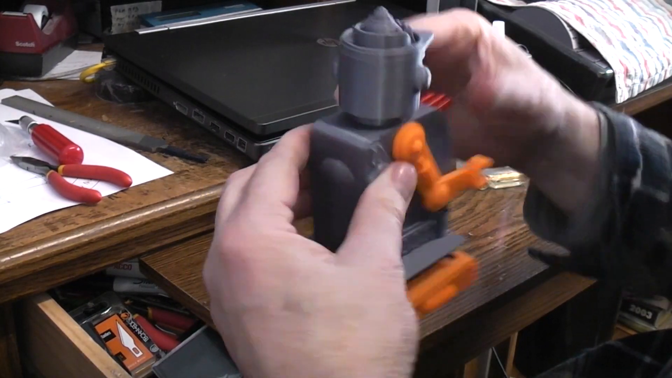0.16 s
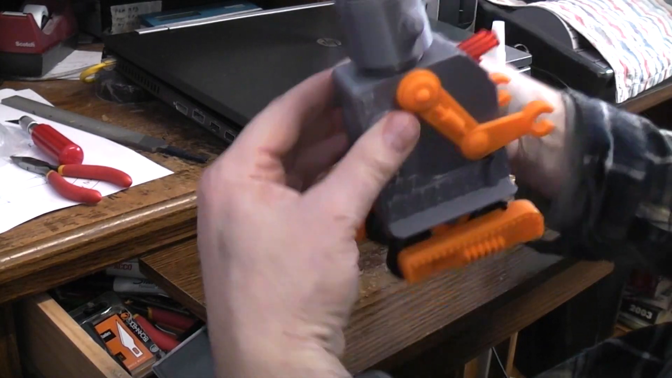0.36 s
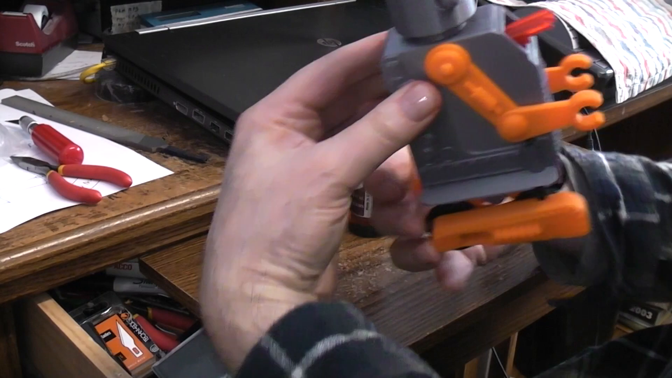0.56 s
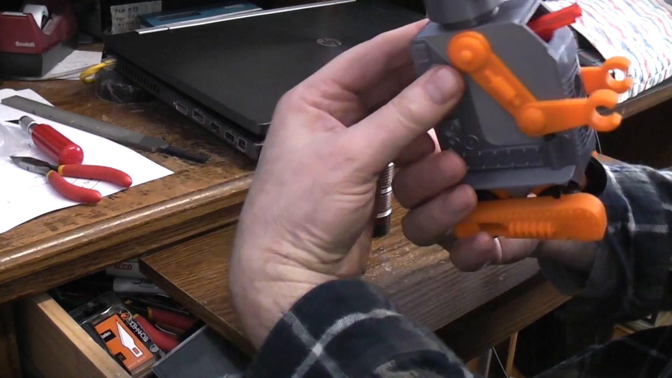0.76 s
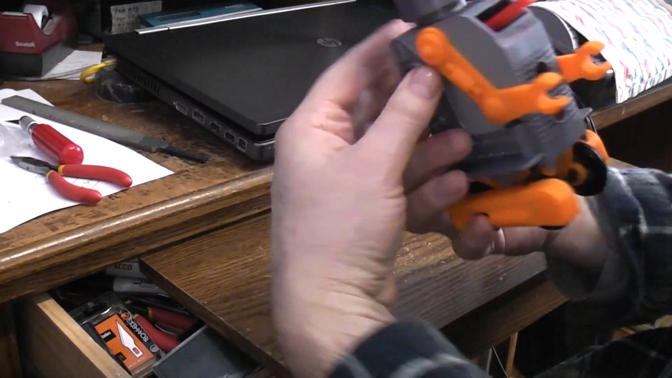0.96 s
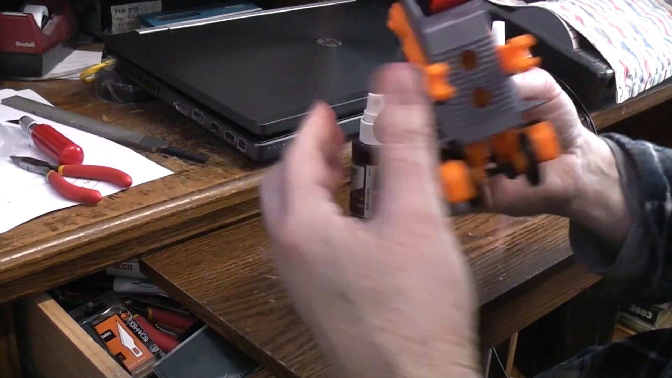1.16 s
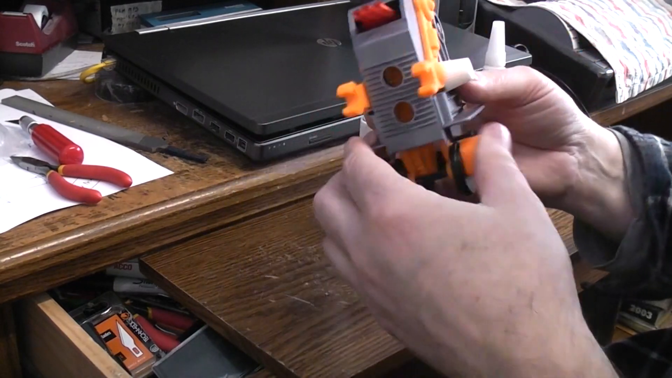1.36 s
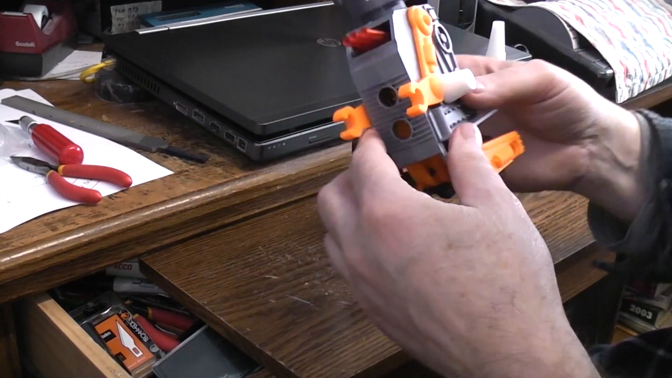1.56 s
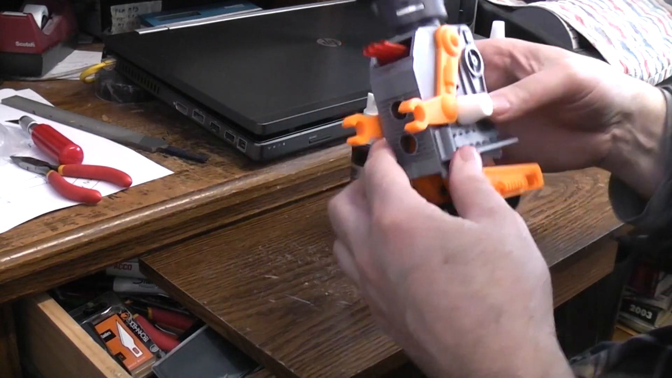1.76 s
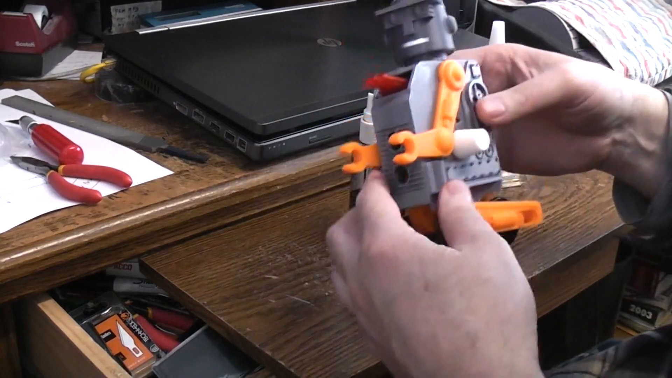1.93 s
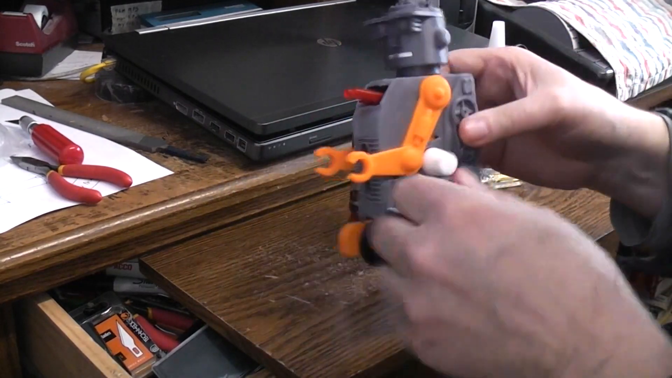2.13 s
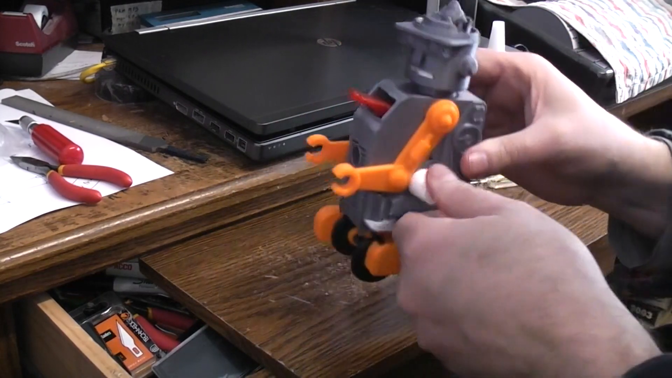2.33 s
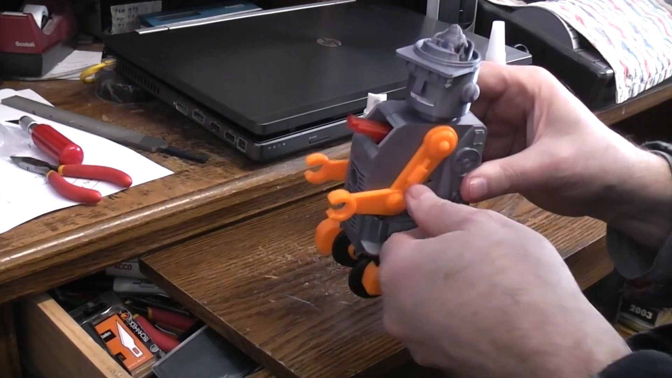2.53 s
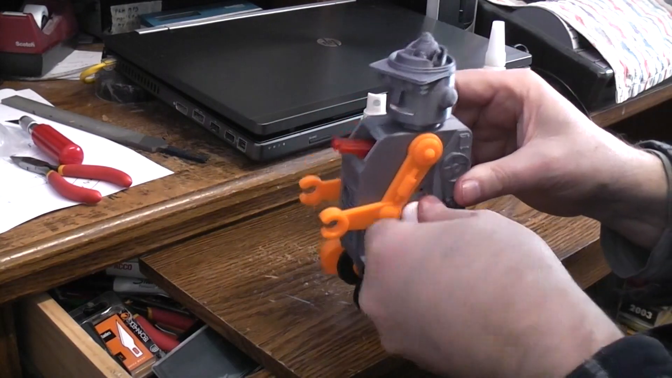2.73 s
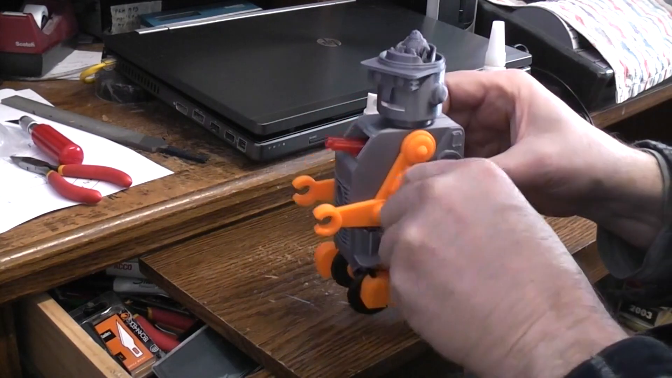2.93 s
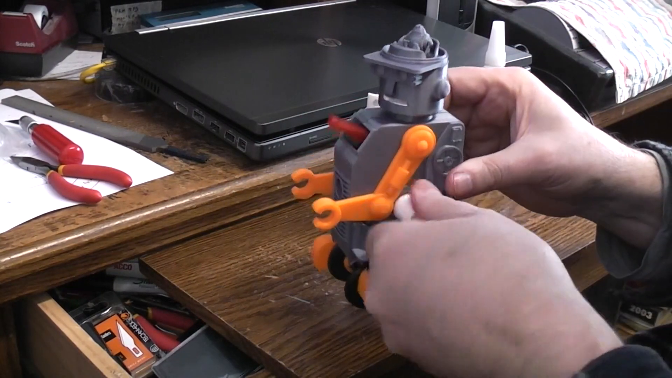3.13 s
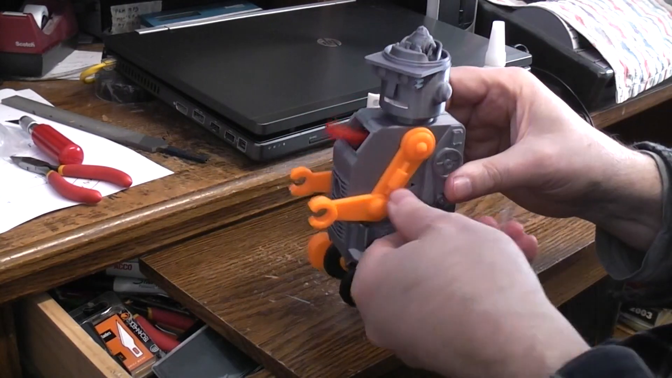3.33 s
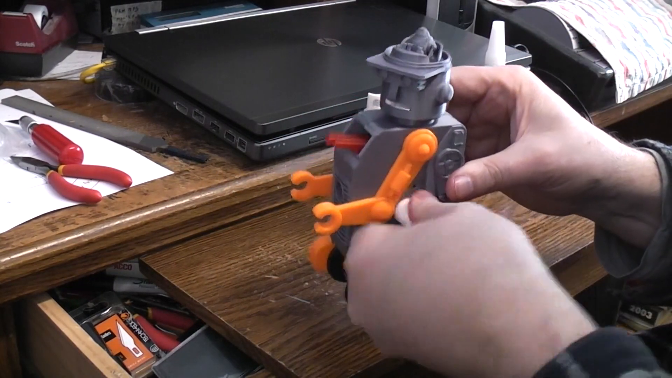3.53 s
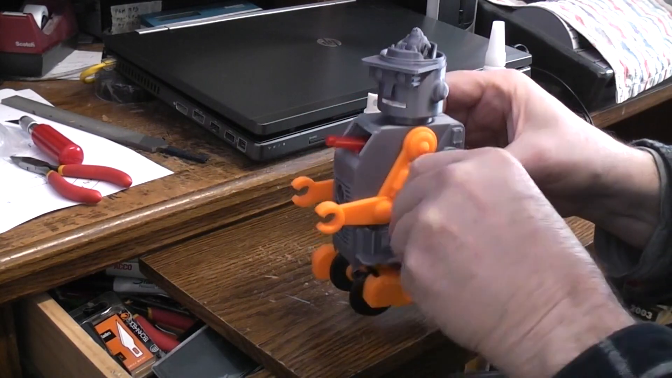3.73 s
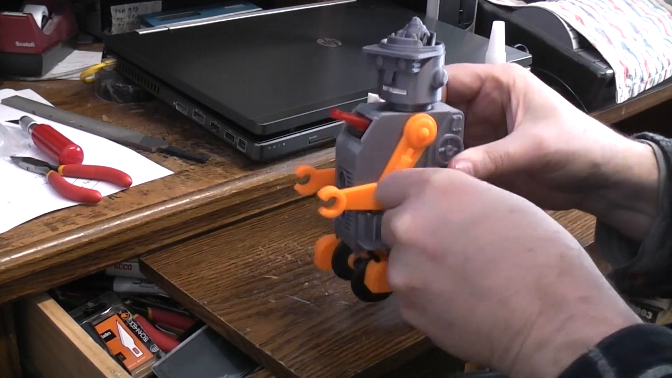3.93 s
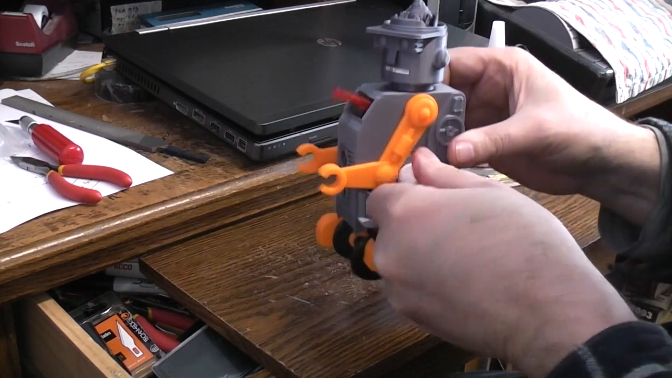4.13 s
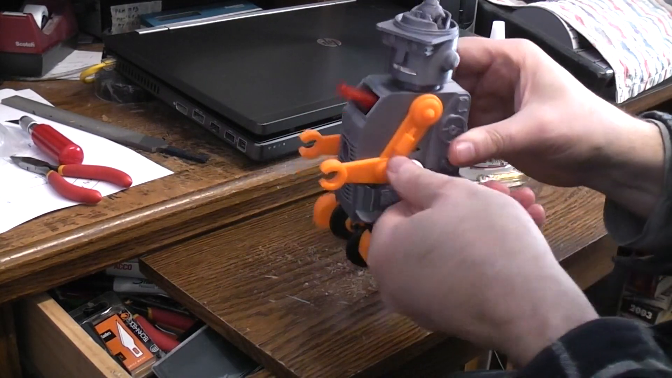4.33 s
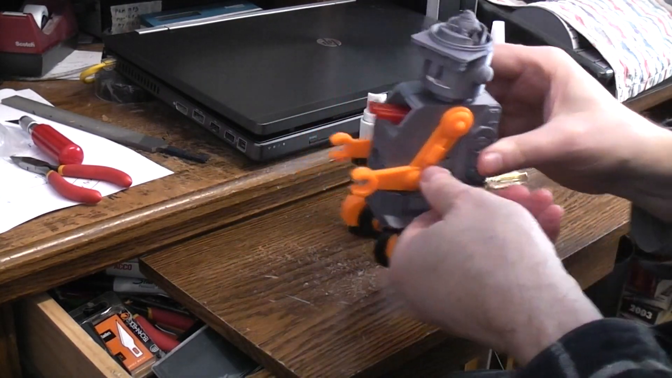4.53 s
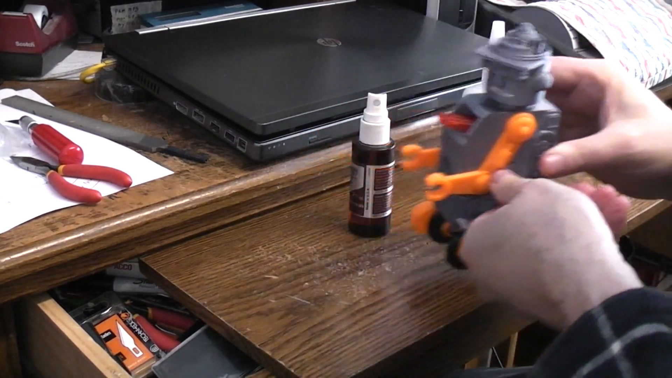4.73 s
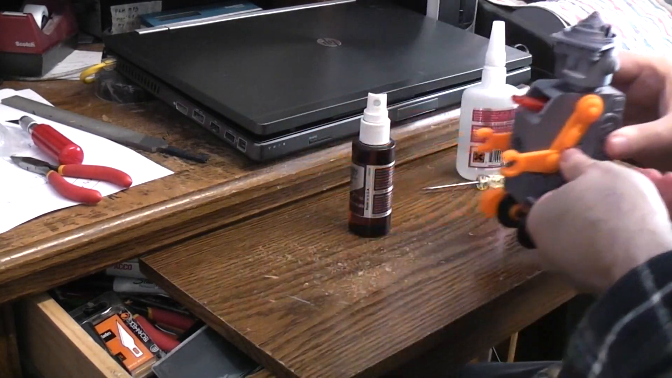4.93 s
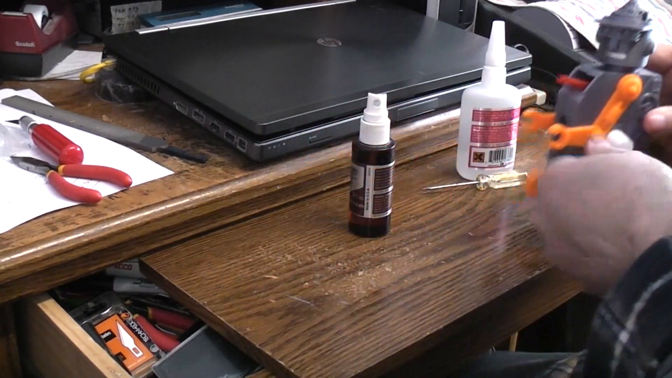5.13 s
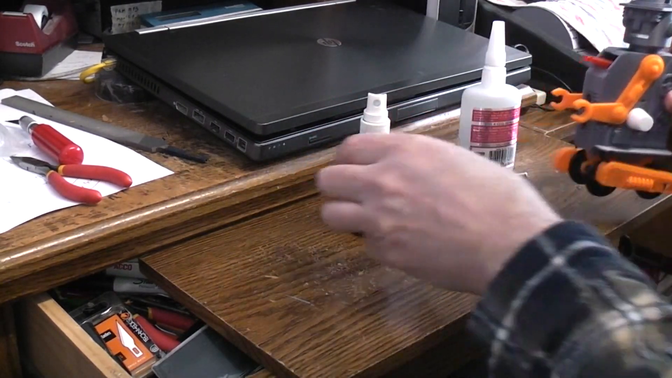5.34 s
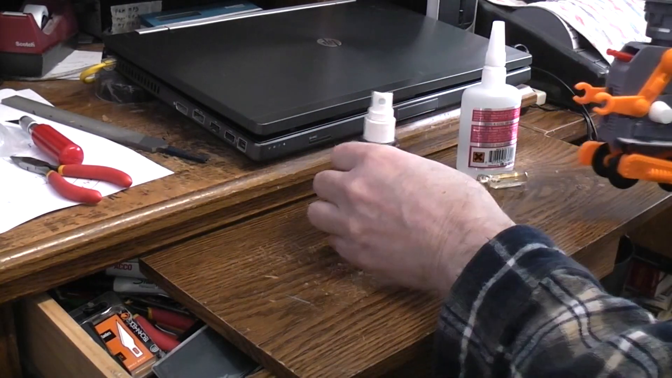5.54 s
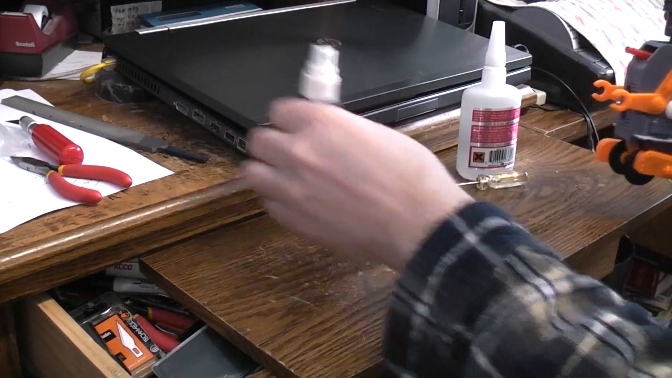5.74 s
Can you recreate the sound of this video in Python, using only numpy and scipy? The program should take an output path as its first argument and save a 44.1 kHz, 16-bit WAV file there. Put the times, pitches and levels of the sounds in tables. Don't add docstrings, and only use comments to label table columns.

```python
import sys
import numpy as np
from scipy import signal
from scipy.fft import rfft, irfft
from scipy.io import wavfile
from scipy.ndimage import uniform_filter1d

SR = 44100
rng = np.random.default_rng(int(sys.argv[2]) if len(sys.argv) > 2 else 0)


def unload_wav(signal):
    wavfile.write(
        sys.argv[1],
        SR,
        np.round(np.clip(np.atleast_2d(signal).T, -1, 1) * 32767).astype(np.int16),
    )


def voltage_ratio(decibels):
    exponent = np.asarray(decibels, float) / 20
    return 10 ** exponent


N = 255559
SIZE = 8192

# pitch in Hz, level in dB per Hz.
ROOM_TONE = [(15, -30), (28, -17.0), (40, -28), (55, -10.0)] + [(56, -47), (95, -16), (146, -2.0),
             (219, -7.0), (330, -4.0), (367, -5.0), (669, -8.5), (884, -10.5), (1510, -13.5),
             (16000, -42.5)][1:]
HUM_HZ, HUM_DB, AIR_DB = 70.6, -12.5, -55.5
ROOM_T60_LOW_S, ROOM_T60_HIGH_S, ROOM_DB = 0.23, 0.19, -3.5
DUCK_DB, DUCK_ATTACK_S, DUCK_RELEASE_S, RUN_DUCK_DB = 10.5, 0.022, 0.1, 0.5
# start in seconds, full in seconds, let go in seconds, stop in seconds, level in dB.
REACH = [
    (5.24, 5.33, 5.62, 5.5, -62),
]

# start in seconds, peak in dB, contact in seconds, bottle ring in dB.
KNOCKS = [
    (5.27, -43, 0.014, -62),
    (5.297, -42, 0.011, -62),
    (5.312, -37, 0.0067, -49),
    (5.335, -42, 0.01, -62),
    (5.601, -33.5, 0.01, -31.5),
    (5.635, -42, 0.0067, -49),
]
# pitch in Hz, width in Hz, level in dB.
DESK = [(121.7, 31, -0.5), (248, 30, 13), (360, 60, 5), (447, 70, 10.5), (1110, 82, -23)]
# pitch in Hz, width in Hz, level in dB.
BOTTLE = [(762, 20, 6), (798, 31, -10), (3300, 900, -27)]

# start in seconds, full in seconds, let go in seconds, stop in seconds, level in dB.
RUB = [
    (4.66, 4.715, 4.9, 5.02, -45),
    (5.22, 5.286, 5.32, 5.39, -48),
    (5.1, 5.125, 5.14, 5, -59),
    (4.9, 4.94, 4, 5.9, -61),
    (6.2, 5.33, 5.36, 5.7, -58),
]
# pitch in Hz, level in dB per Hz.
CLOTH = [(500, -13.5), (1000, -5), (1600, -2), (3000, -2.5), (5000, -5), (8600, -11), (16000, -24.5)]

# pitch in Hz, width in Hz, level in dB.
LOOSE = [(868, 86, -5), (1104, 72, 1), (1570, 67, -5.5), (2100, 190, -15), (2490, 360, -14),
         (3230, 98, -13.5), (3540, 110, -25), (3970, 21, -33), (4870, 210, -13.5), (5510, 150, -12.5)]
# pitch in Hz, width in Hz, level in dB.
SHELL = [(1239, 77, 0), (1677, 102, 0), (2086, 130, -12.5), (2580, 123, 0), (2916, 34, -5),
         (3220, 144, -7.5), (3880, 270, -11), (4016, 65, -16), (5230, 190, -7), (6100, 220, -16),
         (6600, 42, -16), (7150, 51, -1.5), (8300, 43, -6), (9750, 180, -12), (10800, 39, -26)]
# pitch in Hz, level in dB per Hz.
SHELL_SKIN = [(240, -63.5), (400, -23.5), (979, -12.5), (1220, 1.5), (1650, -2.5), (2250, -17),
              (2550, -10.5), (4380, -9), (7280, -6.5), (16000, -18)]
# start in seconds,
# peak in dB, struck panel in Hz, hollowness in dB.
HANDLING_TICKS = [(0.16, -44.5, 2400, 11.5), (0.199, -43.5, 2900, 8.5), (0.24, -44, 3080, -4),
                  (0.274, -42.5, 3300, 9), (0.365, -35, 3120, 6.5), (0.374, -35.5, 3120, -11),
                  (0.424, -40, 2450, 11), (0.4372, -29, 3290, 3), (0.4818, -32, 3220, 2),
                  (0.495, -27.5, 3220, 0), (0.5949, -30, 2760, 2.5), (0.6389, -28, 2910, 9),
                  (0.7163, -40.5, 4030, -10), (0.7569, -32, 3000, 5.5), (0.806, -38, 2520, 8),
                  (0.866, -47, 2320, 15.5), (0.897, -54, 2590, 12), (0.9563, -41.5, 3030, 5.5),
                  (1.0214, -42, 4970, -21), (1.0346, -35, 2980, 5.5), (1.0617, -36.5, 3200, 6),
                  (1.0988, -44, 2470, 15.5), (1.1243, -47, 2320, 14.5), (1.18, -40, 2440, 5),
                  (1.194, -35.5, 3100, -25), (1.219, -27.5, 2220, 0.5), (1.241, -18.5, 2880, -0.5),
                  (1.312, -31.5, 2970, 5), (1.3647, -37, 3320, 3),
                  (1.5267, -44.5, 3260, 8), (1.5662, -33.5, 3280, -1), (1.7647, -37, 4960, -1),
              (1.8217, -28.5, 2680, 0), (1.888, -54, 3150, -24), (1.947, -32, 3040, 3),
              (1.996, -30.5, 3080, -1), (2.0357, -38.5, 4100, -19), (2.071, -37.5, 4800, -7),
              (2.1154, -34, 3040, 4), (2.248, -33.5, 2620, -2.5), (2.286, -44.5, 2560, 10),
              (2.3313, -76, 2000, -12), (2.35, -30, 2470, 2), (2.414, -35.5, 2080, 1),
              (2.489, -37, 2580, 1), (2.6494, -34.5, 4000, -12), (2.6642, -32, 2400, 3.5)]
# start in seconds, peak in dB, struck panel in Hz, hollowness in dB.
LAST_TICKS = [
    (2.735, -24.5, 2540, 3),
    (4.4588, -19, 2780, 1.5),
    (4.6389, -40, 3620, 4.5),
    (4.8556, -33, 2740, 1.5),
    (5.1218, -39, 2880, 4),
]
# time in seconds, level in dB.
HANDS = [
    (0.12, -61),
    (0.17, -47.5),
    (0.3, -59),
    (0.8, -52),
    (1.2, -46),
    (1.42, -67),
    (1.54, -52.5),
    (1.74, -53),
    (2.05, -63),
    (2.6, -57.5),
]

# start in seconds, peak in dB.
SNAPS = [(0.2414, -47), (0.3652, -34), (0.4718, -37), (0.5084, -34), (0.7567, -30), (0.7847, -35),
         (0.8505, -45), (0.955, -41), (1.023, -37), (1.061, -37), (1.8864, -36), (1.997, -34), (2.242, -40),
         (2.3493, -33), (2.414, -42), (2.4783, -54), (2.6497, -42), (2.7523, -10.5), (3.1842, -15.5),
         (3.418, -16.5), (3.5016, -18), (3.998, -18.5), (4.338, -20.5), (4.4584, -21.5)]
SNAP_S, SNAP_LOW_HZ, SNAP_DB = 0.0017, 4500, -1
# start in seconds, peak in dB, shell share in dB.
CRACKS = [(0.289, -56, 17), (0.3752, -48.5, 21.5), (0.381, -43, -20), (0.4825, -40, -20), (0.5088, -33, 5),
          (0.6285, -39, -12), (0.6361, -38, -12), (0.662, -46, 20.5), (0.767, -42, -2), (0.771, -40, -2),
          (0.785, -39.5, 11.5), (0.821, -50, 9.5), (1.0277, -39, -13), (1.2229, -30, -2),
          (1.27, -40.5, 19.5), (1.319, -48, 14), (1.5657, -45, 11), (1.6159, -51, 0), (1.7137, -52, -6),
          (1.7341, -44, -6), (1.8953, -36, -14), (1.9446, -41, 2), (1.9965, -44, 10), (2.1138, -49, -4),
          (2.655, -32, 1), (2.7526, -5.5, -26), (3.1158, -21, 3), (3.1782, -20, 2), (3.226, -15, -7),
          (3.2325, -19, 4), (3.2472, -22.5, 9), (3.2974, -24, 7), (3.4644, -29, 8), (3.502, -14, -25),
          (3.7605, -14.5, -10), (3.9138, -26.5, 6), (4.25, -23, 8.5), (4.2544, -24, 7), (4.3019, -27, 8),
          (4.355, -22, -6), (4.3705, -26, 10), (4.4594, -18.5, 0.5), (4.6398, -48, 7), (4.986, -59, 15),
          (5.123, -53, 11), (5.131, -50.5, 15)]
# pitch in Hz, width in Hz, level in dB.
PIN = [(5240, 1100, -1), (7770, 420, -3), (10600, 1100, -7), (13500, 1800, -11)]
CRACK_LOW_HZ = 4200

# start in seconds, full in seconds, let go in seconds, stop in seconds, level in dB.
RUNS = [
    (2.62, 2.664, 3.02, 2.8, -45.5),
    (3.05, 3.124, 3.475, 3.54, -26),
    (3.87, 3.912, 4.39, 4.503, -28.5),
    (4.452, 4.459, 4.523, 4.58, -37),
]
# start in seconds, peak in dB, struck panel in Hz,
# hollowness in dB.
TEETH = [(3.0664, -43, 2580, 7), (3.09, -32, 3730, 3), (3.115, -11.5, 2500, -7),
         (3.1351, -12.5, 2520, -7.5), (3.1493, -14, 2580, -6), (3.178, -16, 2580, -21),
         (3.1866, -14, 3230, -22), (3.2035, -16.5, 3220, -24), (3.231, -17, 7300, -10),
         (3.2459, -23, 2290, -4), (3.282, -22.5, 2500, -1.5), (3.3019, -12, 3220, -11),
         (3.3387, -20, 2540, -4), (3.368, -11, 2680, -7), (3.4104, -19, 2540, 4.5),
         (3.419, -12.5, 2510, -3), (3.435, -25, 5040, -6), (3.4633, -17, 2560, -3),
         (3.89, -28.5, 2580, -4), (3.914, -19.5, 2580, -6), (3.9324, -21.5, 3840, -4),
                (3.9739, -14, 2460, -4.5), (3.9903, -12, 2540, -25), (3.9993, -14, 3230, -38),
                (4.008, -22, 5320, -15), (4.0234, -16.5, 3190, -22), (4.067, -15, 3220, -17),
                (4.086, -16.5, 2580, -9), (4.112, -11, 3250, -10.5), (4.154, -11, 2550, -23),
                (4.1729, -15, 2600, -27), (4.189, -18.5, 2580, -20), (4.2095, -20, 4040, -17),
                (4.2417, -17.5, 2680, -29), (4.2583, -11.5, 4040, -23), (4.3231, -13, 2560, -11),
                (4.338, -14, 2570, -5.5), (4.3543, -17.5, 2640, -12), (4.368, -15.5, 2540, -7.5),
                (4.3994, -23, 2480, -4), (4.4189, -25.5, 2580, 4)]
JIGGLE_DB, CATCH_DB, JIGGLE_RISE_S, JIGGLE_FALL_S = -11, -18, 0.012, 0.03

# start in seconds, peak in dB, shell share in dB, rebound in dB.
PAWL = [(2.7523, -12, -31, -3), (2.7673, -12.5, -35, -4), (2.7836, -13, -30, 1), (2.8038, -12, -39, -3),
        (2.8341, -10, -25, -4), (2.8586, -14, -14, 1), (2.8778, -9.5, -19.5, -8), (2.897, -9, -15, -7),
        (2.9205, -9, -25, -13), (2.9518, -8.5, -15, -4), (3.5013, -8.5, -38, -7), (3.5454, -9, -10.5, -0.5),
        (3.5751, -9.5, -12, -6), (3.6012, -13, -14.5, 3), (3.618, -9.5, -16, -4), (3.6344, -12, -20, -6),
        (3.6513, -10.5, -19.5, -10), (3.666, -16, -33, 5.5), (3.6864, -10.5, -21, -2),
        (3.7075, -10.5, -18.5, -6), (3.7296, -11, -15.5, -9), (3.7599, -10, -14, -16)]
# start in seconds, full in seconds, let go in seconds, stop in seconds, level in dB.
WIND = [
    (2.755, 2.8, 2.97, 3.036, -34.5),
    (3.503, 3.6, 3.785, 3.82, -33.5),
]
# pitch in Hz, width in Hz, level in dB.
RATCHET = [(2540, 62, -4.5), (4000, 240, -11), (5050, 180, -8), (6850, 560, -9.5), (7970, 640, -3.5),
           (7750, 78, -4), (9670, 520, -7), (11900, 700, -13), (14500, 510, -11)]
# pitch in Hz, level in dB per Hz.
RATCHET_SKIN = [(290, -52), (500, -44.5), (1200, -10.5), (1950, -35), (2500, -6.5), (3880, -12.5),
                (4230, -12), (7940, -7), (15300, -12), (16500, -24)]
# pitch in Hz, gain in dB.
MIC = [(20, 1), (8800, 0.5), (9350, -1.5), (9900, -0.5), (15750, -9), (16200, -38), (17000, -48),
       (17600, -91)]


def unit(x):
    return x / np.sqrt(np.mean(x ** 2, axis=-1, keepdims=True))


def shape(table, size):
    hz, db = np.transpose(table)
    f = np.maximum(np.fft.rfftfreq(size, 1 / SR), 1)
    cepstrum = irfft(np.log(voltage_ratio(np.interp(np.log(f), np.log(hz), db))))
    cepstrum[1:size // 2] *= 2
    cepstrum[size // 2 + 1:] = 0
    return np.exp(rfft(cepstrum))


def colour(x, table):
    response = irfft(shape(table, SIZE))
    if x.ndim > 1:
        response = response[None]
    return signal.fftconvolve(x, response)[..., :N]


def body(modes, strike_db):
    f = np.fft.rfftfreq(SIZE, 1 / SR)
    return sum(voltage_ratio(db + extra_db) * width / (width + 2j * (f - hz))
               for (hz, width, db), extra_db in zip(modes, strike_db))


def rattle(length):
    t = np.arange(SIZE) / SR / max(length, 2e-4)
    impacts = rng.standard_normal(SIZE) * rng.uniform(0.22, 1.26, SIZE)
    return impacts * (1 - np.exp(-t / 0.19)) * np.exp(-t)


def add(out, s, sound, db, pan_db=0):
    i = int(s * SR)
    sound = (sound / np.abs(sound).max())[:N - i]
    sides_db = np.array([[pan_db], [-pan_db]]) / 2
    out[:, i:i + len(sound)] += sound * voltage_ratio(db + sides_db)


def walk(rate):
    k = int(SR / rate)
    steps = np.repeat(rng.standard_normal(N // k + 1), k)
    return np.clip(unit(uniform_filter1d(steps, k)[:N]), -2, 2)


def grains(rate, spread_db):
    impacts = (rng.random(N) < rate / SR) * rng.standard_normal(N)
    return unit(impacts * voltage_ratio(spread_db * np.minimum(rng.exponential(1, N), 2.5)))


def split(x, hz):
    return [unit(signal.sosfilt(signal.butter(4, hz, kind, fs=SR, output="sos"), x))
            for kind in ("low", "high")]


def bands(low_hz, high_hz):
    f = np.fft.rfftfreq(SIZE, 1 / SR)
    low = 1 / (1 + (f / low_hz) ** 8)
    high = 1 - 1 / (1 + (f / high_hz) ** 8)
    return low, 1 - low - high, high


def stroke(rows, rise_db, fall_db, late_s=0., silent=-90):
    t = np.arange(N) / SR
    levels = []
    for start, full, let_go, stop, db in rows:
        times = np.maximum.accumulate([start - .01, start, full + late_s, let_go, stop, stop + .012])
        levels.append(np.interp(t, times, [silent, db - rise_db, db, db, db - fall_db, silent]))
    return np.max(levels, axis=0)


def chatter(impacts, modes, skin):
    ring = voltage_ratio(-4) * colour(impacts, skin)
    for hz, width, db in modes:
        pole = np.exp((2j * np.pi * hz - np.pi * width) / SR)
        panel = signal.lfilter([1], [1, -pole], impacts * voltage_ratio(2.2 * walk(30))).real
        ring = ring + voltage_ratio(db) * 2 * (1 - abs(pole)) * panel
    return ring


def duck():
    since = np.arange(N) / SR - np.array(PAWL)[:, :1]
    held = np.where(since > 0, np.exp(-np.abs(since) / DUCK_RELEASE_S), 0).max(axis=0)
    running = voltage_ratio(stroke(RUNS, 30, 11) + 18)
    attack = int(DUCK_ATTACK_S * SR)
    return -uniform_filter1d(DUCK_DB * held + RUN_DUCK_DB * running, attack + 1, origin=attack // 2)


def room_tone():
    mid, side = colour(rng.standard_normal((2, N)), ROOM_TONE)
    left = voltage_ratio(-5.0) * (mid + 0.29 * side)
    right = voltage_ratio(-4.5) * (mid - 0.43 * side)
    air = unit(np.array([left, right]).ravel()).reshape(2, N)
    phase = 2 * np.pi * np.cumsum(HUM_HZ + 0.6 * walk(3)) / SR
    hum = np.sin(phase) * voltage_ratio(HUM_DB + 0.78 * walk(22))
    level = voltage_ratio(AIR_DB + duck() + 3.0) + voltage_ratio(stroke(REACH, 12.0, 16))
    return (air + hum * voltage_ratio([[-.7], [.7]])) * level


def room(x, count=4):
    t, place, out = np.arange(int(.45 * SR)) / SR, np.arange(N) / SR * 9, 0
    mono = x.mean(axis=0)[None]
    for k in range(count):
        low, high = split(rng.standard_normal((3, len(t))), 3420)
        tail = 0.4 * low * voltage_ratio(-60 * t / ROOM_T60_LOW_S) + high * voltage_ratio(-60 * t / ROOM_T60_HIGH_S)
        tail = (tail[:1] + 1.34 * tail[1:]) * np.clip(t / 0.00087, 0, 1)
        tail = tail / np.sqrt((tail ** 2).sum(axis=1, keepdims=True))
        share = np.sqrt(np.clip(1 - np.abs((place - k) % count - 1), 0, 1))
        out = out + signal.fftconvolve(share * mono, tail)
    return voltage_ratio(ROOM_DB) * out[:, :N]


def desk():
    out = np.zeros((2, N))
    wood, glass = body(DESK, np.zeros(len(DESK))), body(BOTTLE, np.zeros(len(BOTTLE)))
    for s, db, contact, ring_db in KNOCKS:
        add(out, s, irfft(wood * rfft(rattle(contact))), db, -1.5)
        add(out, s, irfft(glass * rfft(np.hanning(14), SIZE)), ring_db, -1.5)
    return out


def rubbing():
    low, high = split(colour(grains(12000, 1.9) * voltage_ratio(2.0 * walk(30)), CLOTH), 5015)
    db = stroke(RUB, 18.0, 28) - 3
    high_db = db - 6.5 + 0.12 * (db + 49)
    return voltage_ratio(db) * low + voltage_ratio(high_db) * high


def shell_hits(table, modes, length, low_hz, treble_db, thinning):
    out, skin = np.zeros((2, N)), shape(SHELL_SKIN, SIZE)
    shares = bands(1990, 5270)
    for s, db, hz, hollow_db in table:
        struck = modes + [(hz, 150, 2), (rng.choice(low_hz), 90, 3)]
        ring = body(struck, 2.2 * rng.standard_normal(len(struck))) + voltage_ratio(-2) * skin
        ring = ring * rfft(rattle(length * rng.uniform(0.84, 1.53)))
        pan_db = 1.7 + 2.0 * rng.standard_normal()
        for share, rel_db in zip(shares, (hollow_db, 0, treble_db - thinning * hollow_db)):
            add(out, s, irfft(ring * share), db + rel_db - 4.0, pan_db)
    return out


def snaps():
    out, edge = np.zeros((2, N)), shape(CLOTH, SIZE) * bands(1000, SNAP_LOW_HZ)[2]
    for s, db in SNAPS:
        add(out, s, irfft(edge * rfft(rattle(SNAP_S))), db + SNAP_DB, .6)
    return out


def cracks():
    out, (low, mid, high) = np.zeros((2, N)), bands(950, CRACK_LOW_HZ)
    tick = irfft(high * (body(PIN, np.zeros(len(PIN))) + voltage_ratio(-2) * shape(CLOTH, SIZE)))
    ring = irfft(mid * (body(SHELL, np.zeros(len(SHELL))) + voltage_ratio(-7.5) * shape(SHELL_SKIN, SIZE)))
    for s, db, shell_db in CRACKS:
        add(out, s, tick[:SIZE // 2], db, .6)
        add(out, s, ring[:SIZE // 2], db + shell_db, .6)
    return out


def shaken(base_db, knocks, swell_db, fall_s):
    t, power = np.arange(N) / SR, voltage_ratio(2 * base_db)
    for s, db, _, _ in knocks:
        near = slice(int((s - .05) * SR), int((s + .3) * SR))
        fade_s = np.where(t[near] < s, JIGGLE_RISE_S, fall_s)
        power[near] += voltage_ratio(2 * (db + swell_db)) * np.exp(-2 * np.abs(t[near] - s) / fade_s)
    return 10 * np.log10(power)


def gears(low_db, high_db, modes):
    impacts = grains(6000, 1.3) * voltage_ratio(1.97 * walk(90))
    low, high = split(chatter(impacts, modes, SHELL_SKIN), 4400)
    return voltage_ratio(low_db - 5) * low + voltage_ratio(high_db - 4) * high


def ratchet():
    out, skin, (low, mid, high) = np.zeros((2, N)), shape(RATCHET_SKIN, SIZE), bands(2000, 2850)
    for s, db, shell_db, rebound_db in PAWL:
        ring = body(RATCHET, 2.2 * rng.standard_normal(len(RATCHET))) + voltage_ratio(1.5) * skin
        add(out, s, irfft(high * ring * rfft(rattle(0.0005))), db - 1.5, .6)
        for side_db in (9, -8):
            add(out, s, irfft(high * ring * rfft(rattle(0.0032))), db - 10.5, side_db)
        add(out, s + 0.0081, irfft(high * ring * rfft(rattle(0.0021))), db + rebound_db - 3.5, .6)
        add(out, s, irfft((low + mid) * ring * rfft(rattle(0.0061))), db + shell_db - 5.5, .6)
    scrape = chatter(grains(9000, 1.5) * voltage_ratio(0.63 * walk(110)), RATCHET, RATCHET_SKIN)
    return out + unit(scrape) * voltage_ratio(stroke(WIND, 4, 22))


def scene():
    ticks, teeth = HANDLING_TICKS, TEETH
    hands_db = np.interp(np.arange(N) / SR, *np.transpose(HANDS), left=-90, right=-90)
    loose_db = shaken(hands_db, ticks, JIGGLE_DB, JIGGLE_FALL_S)
    knocks = (shell_hits(ticks, LOOSE, 0.0045, low_hz=(1050, 1120, 1280), treble_db=-11.5, thinning=0.42)
              + shell_hits(teeth, SHELL, 0.0037, low_hz=(1240, 1660), treble_db=-13.0, thinning=0.2)
              + shell_hits(LAST_TICKS, SHELL, 0.0075, low_hz=(1500, 1560), treble_db=-13.0, thinning=0.76))
    run_low_db = shaken(stroke(RUNS, 28.5, 23.5), teeth, CATCH_DB, 0.0097)
    run_high_db = stroke(RUNS, 24, 44, late_s=0.037) - 6
    runs = gears(run_low_db, run_high_db, SHELL)
    toy = knocks + snaps() + cracks() + ratchet() + gears(loose_db, loose_db - 14, LOOSE) + runs
    toy = signal.sosfilt(signal.butter(4, 760, "high", fs=SR, output="sos"), toy)
    near = toy + rubbing() + desk()
    return near + room(near) + room_tone()


def roll_off(x):
    return signal.sosfilt(signal.butter(12, 16980, fs=SR, output="sos"), x)


def record(dry):
    mix = colour(dry, MIC)
    return roll_off(mix)


dry = scene()
out = record(dry)
unload_wav(out)
```